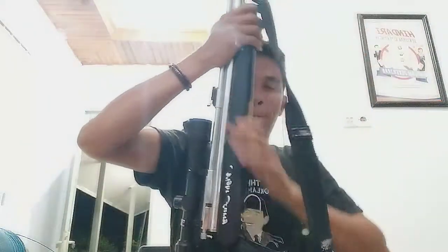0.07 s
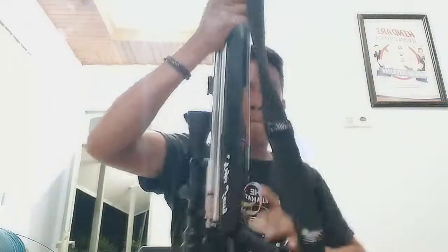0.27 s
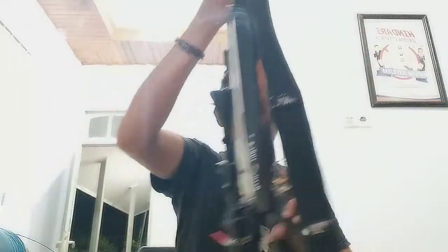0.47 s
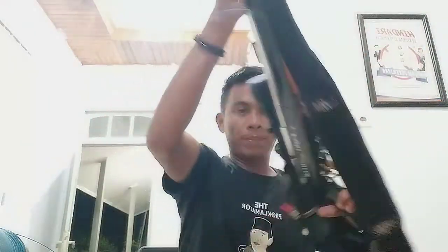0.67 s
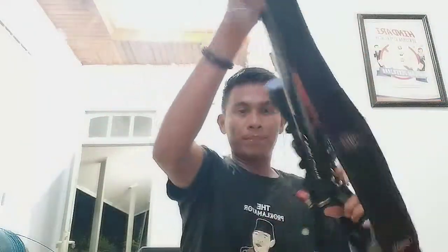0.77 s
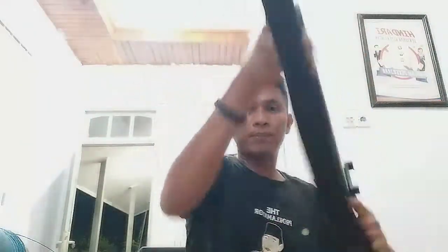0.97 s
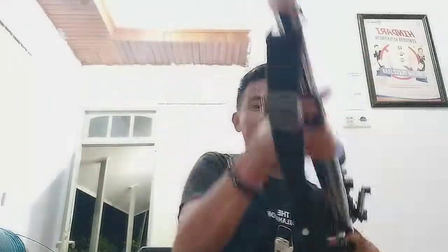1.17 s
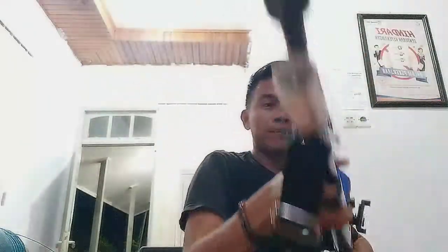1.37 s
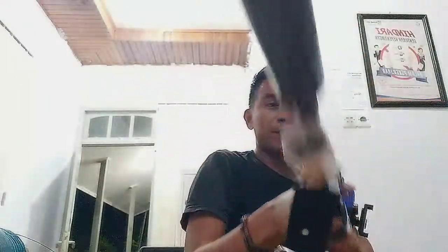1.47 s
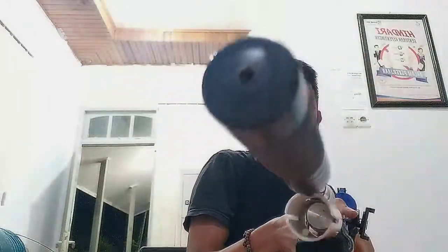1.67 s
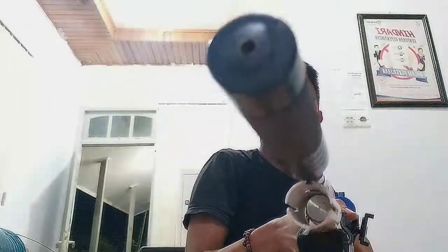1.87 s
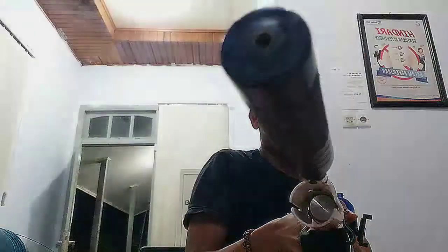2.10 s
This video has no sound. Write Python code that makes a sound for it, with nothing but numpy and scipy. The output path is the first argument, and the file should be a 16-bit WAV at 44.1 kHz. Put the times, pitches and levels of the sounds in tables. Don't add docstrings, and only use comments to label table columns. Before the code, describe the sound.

An air rifle's steel pump lever clacks loudly at once, ringing briefly off bare walls; then faint cloth rustle, a tiny tick, a click with a puff of air, and a dull knock, close to a phone microphone.

```python
import sys
import numpy as np
from scipy import signal
from scipy.fft import rfft, irfft, next_fast_len
from scipy.io import wavfile
from scipy.ndimage import map_coordinates

SR = 44100
rng = np.random.default_rng(int(sys.argv[2]) if len(sys.argv) > 2 else 0)


def volts_from_decibels(level):
    exponent = np.asarray(level, float) / 20
    return 10 ** exponent


def master_out(mix):
    frames = np.transpose(np.atleast_2d(mix))
    ceiling = np.clip(frames, -1, 1)
    pcm = np.round(ceiling * 32767).astype(np.int16)
    wavfile.write(sys.argv[1], SR, pcm)


N = 94153

# frequency in Hz, time to fall 60 dB in seconds.
ROOM_DECAY = [(300, 0.81), (1000, 0.6), (3000, 0.56), (7000, 0.53), (13000, .38)]
# frequency in Hz, level in dB per Hz.
CLACK_TONE = [(120, -48), (330, -15.5), (600, -12), (1160, -6.5), (3100, -4.5), (5000, -15), (8600, -20),
              (15200, -30.5)]
# frequency in Hz, width in Hz, level in dB.
LEVER_RESONANCES = [(694, 49, -12), (1166, 71, -2.5), (1640, 27, -8.5), (1890, 250, -4.5), (2250, 43, -5.5),
                    (2633, 78, -10), (2959, 15, -3.5), (3153, 22, 0.5), (3480, 31, -1), (3878, 480, -5),
                    (4103, 46, 0.5), (4570, 50, -18.5)]
# delay in seconds, level in dB.
WALL_SLAPS = [(.0022, -19), (.0068, -14.5), (0.0128, -20), (0.0331, -21)]
# frequency in Hz, level in dB, time to fall 60 dB in seconds.
LEVER_NOTES = [(696, -18.5, 4.5), (1166, -17.5, 2.25), (1513, 4, 0.29), (2047, -11, 0.4),
               (2195, -8.5, 0.33), (2190, -10, 0.62), (3032, -6, 0.13), (3520, -11.5, 0.57),
               (3750, -12.5, 0.41), (3900, -1, 0.39), (4300, -3, 0.24), (5280, -3, 0.56)]
# time in seconds, level in dB.
PHONE_GAIN = [(0.4, -56.5), (0.92, -58), (1.344, -52), (1.806, -52), (2.13, -51)]
# frequency in Hz, level in dB.
HUM_NOTES = [(118.4, -68.5), (188.4, -64.5), (376.8, -63.5), (495.3, -67), (538.3, -62), (565.2, -56.5),
             (721.4, -59.5), (759, -61.5), (775.2, -69.5)]
# frequency in Hz, level in dB per Hz.
DRONE_TONE = [(18, -57.5), (30, -14), (303, -12), (379, -6), (456, -9), (548, -6.5), (613, -12),
              (737, -13.5), (2500, -38.5), (3250, -77.5), (5500, -120)]
# time in seconds, level in dB.
SLEEVE_LEVEL = [(.35, -73), (.47, -69), (.6, -65.5), (.7, -80), (.76, -95)]
# frequency in Hz, level in dB per Hz.
SLEEVE_TONE = [(1200, 1.5), (1650, -10.5), (2050, 8.5), (2400, -33), (4000, -38)]
# start in seconds, blow level in dB, time for the blow to fall 60 dB in seconds,
# room level in dB, room ring time as a share of ROOM_DECAY.
SWIVEL_BLOWS = [
    (.6105, -43, 0.017, -57, 0.78),
]
# start in seconds, blow level in dB, time for the blow to fall 60 dB in seconds, # room level in dB, room
CATCH_BLOWS = [
    (1.076, -54, 0.0054, -66, .6),
    (1.2086, -31.5, 0.035, -45.5, 1),
    (1.3995, -43, 0.016, -59, 0.4),
    (1.6073, -31.5, 0.014, -52.5, 0.5),
]
# start in seconds, blow level in dB, time for the blow to fall 60 dB in seconds,
# room level in dB, room ring time as a share of ROOM_DECAY.
STOCK_BLOWS = [
    (1.6071, -23.5, 0.013, -41, 0.92),
]
# frequency in Hz, level in dB per Hz.
SWIVEL_TONE = [(1200, -26), (1900, -8), (2800, -17.5), (4400, 2), (5300, -7), (6400, -24.5), (8400, -22.5),
               (11000, -55)]
# frequency in Hz, level in dB per Hz.
CATCH_TONE = [(700, -19), (1300, -14.5), (2100, 1.5), (2550, -14), (3100, 1), (4050, 0.5), (5900, -8),
              (8500, -61)]
# frequency in Hz, level in dB per Hz.
STOCK_TONE = [(71, -45.5), (120, -1.5), (518, -1), (683, -4.5), (1330, -6.5), (1930, -6), (2590, -25.5),
              (4950, -29), (10000, -62), (13000, -95), (22000, -120)]
# delay in seconds, level in dB.
STOCK_REBOUNDS = [(.0025, -5.5), (.0046, -8.5), (.0064, -11)]
# time in seconds, level in dB.
SLING_LEVEL = [(1.012, -92), (1.018, -72), (1.1, -64), (1.2, -61), (1.21, -64), (1.45, -75), (1.52, -77),
               (1.6, -71), (1.62, -103)]
# frequency in Hz, level in dB per Hz.
SLING_TONE = [(1000, -25.5), (1550, -2.5), (2100, -11.5), (2700, -20), (4000, -2.5), (5300, -7),
              (6800, -25.5), (9000, -36.5)]
# time in seconds, level in dB.
LEAK_LEVEL = [(1.135, -102), (1.15, -71), (1.18, -73), (1.205, -73)]
# frequency in Hz, level in dB per Hz.
JET_TONE = [(600, -11), (1000, -10.5), (2900, -6), (4100, -6), (6500, -7.5), (8300, -5.5), (12900, -2),
            (15200, -8)]
# frequency in Hz, side level over middle level in dB.
LEFT_LEAN = [(50, -17.5), (120, -49), (1350, -34), (1850, -8), (2500, -22.5), (8800, -44), (9300, -12),
             (9900, -43.5)]
# frequency in Hz, level in dB.
MICROPHONE_TONE = [(40, -14), (80, -11), (110, 1), (8800, -1), (9900, -17), (11000, -5.5), (13000, 1.5),
                   (15400, -0.5)]
# frequency in Hz, level in dB per Hz.
HISS_TONE = [(1180, -28.5), (2000, -2), (2450, -23.5), (3060, -7.5), (4520, -14.5), (7020, -17.5),
             (15200, -21.5)]

PUFF_START_S, PUFF_DB, PUFF_DECAY_S, PUFF_ROOM_DB, PUFF_RISE_S = 1.209, -41, 0.44, -39.5, 0.004
TUBE_HZ, TUBE_ECHO, TUBE_MOUTH = 1186, 0.156, 0.54
BESIDE_SHARE = 0.81


def unit(x):
    return x / np.sqrt(np.mean(x ** 2) + 1e-20)


def along(points, hz):
    f, v = np.transpose(points)
    return np.interp(np.log(hz + 1), np.log(f + 1), v)


def wobble(rate):
    points = rng.standard_normal(int(N * rate / SR) + 4)
    return map_coordinates(points, [np.arange(N) * rate / SR])


def filtered(x, response):
    m = next_fast_len(len(x) + 8192)
    return irfft(rfft(x, m) * response(np.fft.rfftfreq(m, 1 / SR)), m)[:len(x)]


def coloured(x, tone):
    size = 4096
    log_gain = np.log(volts_from_decibels(along(tone, np.fft.rfftfreq(size, 1 / SR))) + 1e-6)
    c = irfft(log_gain, size)
    c = np.r_[c[0], 2 * c[1:size // 2], np.zeros(size // 2)]
    h = irfft(np.exp(rfft(c)), size)[:size // 2]
    return signal.fftconvolve(x, h / np.linalg.norm(h))[:len(x)]


def room_tail(share, rise_s, hold_s=0):
    hz, t, z = signal.stft(rng.standard_normal(SR), SR, nperseg=256)
    decay_s = share * along(ROOM_DECAY, hz)[:, None]
    fade = volts_from_decibels(-60 * np.maximum(t - hold_s, t / 3) / decay_s)
    x = signal.istft(z * fade, SR, nperseg=256)[1][:SR]
    return x * (1 - np.exp(-np.arange(SR) / SR / rise_s))


def placed(x, s):
    return np.pad(x, (round(s * SR), N))[:N]


def level(rows):
    s, db = np.transpose(rows)
    return volts_from_decibels(np.interp(np.arange(N) / SR, s, db, -150, -150))


def desk(x):
    return x + 0.27 * np.roll(x, round(0.00131 * SR))


def blows(rows, tone, rebounds=()):
    out, t = np.zeros(N), np.arange(SR) / SR
    for s, db, decay_s, room_db, share in rows:
        spike = 2.09 * (t < 6e-5)
        burst = volts_from_decibels(db - 60 * t / decay_s) * (rng.standard_normal(SR) - spike)
        dull = coloured(burst, [(1500, 7.5), (6000, -17)]) / 3
        blow = desk(burst)
        for late_s, loss_db in rebounds:
            blow += volts_from_decibels(loss_db) * np.roll(dull, round(late_s * SR))
        room = volts_from_decibels(room_db) * room_tail(share, 0.0049, hold_s=0.025)
        out += placed(coloured(blow + room, tone), s)
    return out


def lingering(x):
    room = room_tail(0.74, 0.009)
    return x + volts_from_decibels(-6) * signal.fftconvolve(x, room / np.linalg.norm(room))[:N]


def lever_clack():
    t = np.arange(SR) / SR
    wash = volts_from_decibels(-24) * room_tail(1, 1e-4)
    for s, db in WALL_SLAPS:
        wash += placed(volts_from_decibels(db - 60 * t / 0.006) * rng.standard_normal(SR), s)[:SR]

    def steel(f):
        peaks = sum(volts_from_decibels(db) * 1j * f * width / (hz * hz - f * f + 1j * f * width)
                    for hz, width, db in LEVER_RESONANCES)
        return 1 + volts_from_decibels(8.5) * peaks

    ring = np.zeros(SR)
    for hz, db, decay_s in LEVER_NOTES:
        fade = volts_from_decibels(-35 + db - 60 * t / min(decay_s, 0.6))
        ring += fade * np.sin(2 * np.pi * hz * t + 6 * rng.random() + 0.8 * wobble(25)[:SR])
    return placed(filtered(coloured(wash, CLACK_TONE), steel) + ring, 0)


def gain_lift():
    s, db = np.transpose(PHONE_GAIN)
    return volts_from_decibels(np.interp(np.arange(N) / SR, s, db))


def distant_machine():
    t = np.arange(N) / SR
    hum = np.zeros(N)
    for hz, db in HUM_NOTES:
        waver_db = 1.77 if hz < 450 else 0.75
        phase = 0.13 * wobble(5.8) + 6 * rng.random()
        hum += volts_from_decibels(db + 55 + waver_db * wobble(9)) * np.sin(2 * np.pi * hz * t + phase)
    drone = unit(coloured(rng.standard_normal(N), DRONE_TONE)) * volts_from_decibels(-2 + 1.5 * wobble(25))
    return gain_lift() * (hum + drone)


def sleeve_brush():
    noise = coloured(rng.standard_normal(N), SLEEVE_TONE)
    return lingering(level(SLEEVE_LEVEL) * volts_from_decibels(3.8 * wobble(29.2)) * noise)


def swivel_tick():
    return blows(SWIVEL_BLOWS, SWIVEL_TONE)


def sling_rustle():
    grains = 1 + 3.2 * (rng.random(N) < 0.01)
    rub = rng.standard_normal(N) * grains * volts_from_decibels(2.7 * wobble(59.6))
    return lingering(level(SLING_LEVEL) * coloured(unit(rub), SLING_TONE) * volts_from_decibels(4))


def catch_snap():
    return blows(CATCH_BLOWS, CATCH_TONE)


def air_leak():
    tone = [(6000, -42), (9000, -8), (13000, -2), (15500, -11)]  # Hz, dB per Hz
    return level(LEAK_LEVEL) * unit(coloured(rng.standard_normal(N), tone))


def air_puff():
    t = np.arange(SR) / SR
    swell = 1 - np.exp(-t / PUFF_RISE_S)
    jet = volts_from_decibels(PUFF_DB - 60 * t / PUFF_DECAY_S) * swell * rng.standard_normal(SR)
    jet = jet + 0.73 * np.roll(jet, round(0.00062 * SR))
    room = volts_from_decibels(PUFF_ROOM_DB) * room_tail(1.24, 0.01)
    puff = placed(coloured(jet + room, JET_TONE), PUFF_START_S)

    def tube(f):
        trip = np.exp(-2j * np.pi * f / TUBE_HZ)
        return (1 + TUBE_MOUTH * trip) / (1 - TUBE_ECHO * trip)

    beside = coloured(volts_from_decibels(PUFF_ROOM_DB) * room_tail(0.85, 0.0094), JET_TONE)
    return filtered(puff, tube) + BESIDE_SHARE * placed(beside, PUFF_START_S)


def air_squeak():
    t = np.arange(SR) / SR
    fade = volts_from_decibels(-69 - 60 * t / 0.35) * np.minimum(t / 0.01, 1)
    return placed(fade * np.sin(2 * np.pi * 14800 * t), 1.455)


def stock_knock():
    return blows(STOCK_BLOWS, STOCK_TONE, STOCK_REBOUNDS)


def scene():
    mid = lever_clack() + distant_machine() + sleeve_brush() + swivel_tick() + sling_rustle()
    mid += catch_snap() + air_leak() + air_puff() + air_squeak() + stock_knock()
    side = filtered(mid, lambda hz: volts_from_decibels(along(LEFT_LEAN, hz)) * np.exp(0.8j))
    return np.array([mid + side, mid - side])


def microphone_hiss():
    return gain_lift() * unit(coloured(rng.standard_normal(N), HISS_TONE)) * volts_from_decibels(-23.5)


def low_pass(x):
    return signal.sosfilt(signal.butter(12, 15350, fs=SR, output="sos"), x)


def record(dry):
    shared, apart = microphone_hiss(), microphone_hiss()
    apart_tone = [(2500, -28.5), (4500, -6.5), (8000, 0), (14500, -0.5), (15200, -21)]  # Hz, dB
    unlike = volts_from_decibels(-2.5) * filtered(apart, lambda hz: volts_from_decibels(along(apart_tone, hz)))
    heard = []
    for x, sign in zip(dry, (1, -1)):
        picked_up = filtered(x, lambda hz: volts_from_decibels(along(MICROPHONE_TONE, hz)))
        heard.append(filtered(picked_up + shared + sign * unlike, lambda hz: hz < 15450))
    return low_pass(np.array(heard))


dry = scene()
out = record(dry)
master_out(out)
```